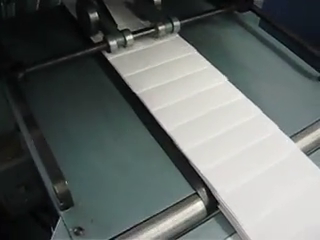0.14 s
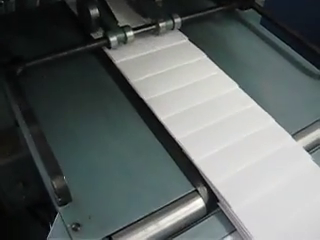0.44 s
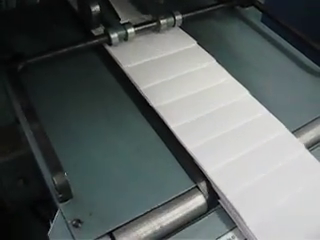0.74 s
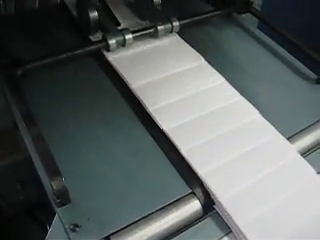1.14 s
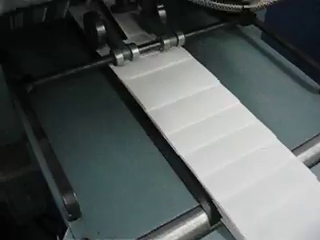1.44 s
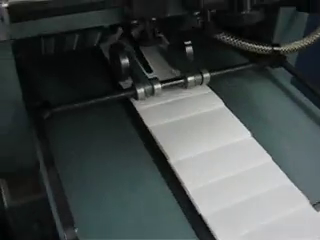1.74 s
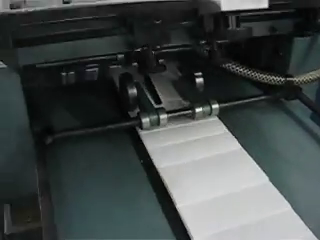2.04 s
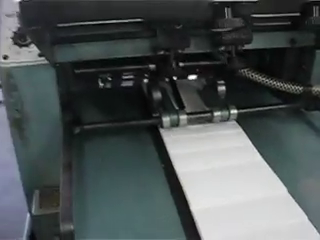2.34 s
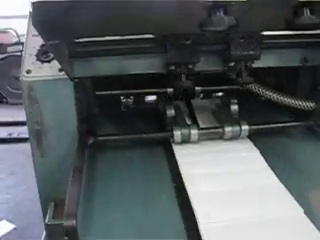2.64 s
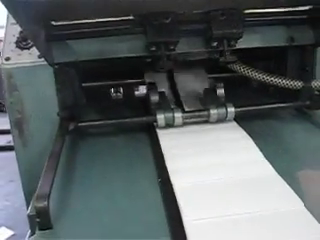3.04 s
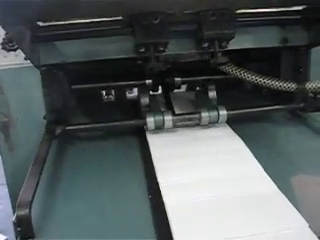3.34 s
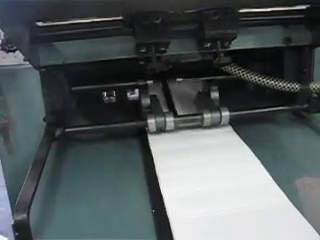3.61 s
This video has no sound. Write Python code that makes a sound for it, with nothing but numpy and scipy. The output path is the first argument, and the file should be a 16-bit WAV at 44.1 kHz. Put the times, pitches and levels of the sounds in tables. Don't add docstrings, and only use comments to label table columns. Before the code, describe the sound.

A paper-folding machine whirrs in a workshop, close to a hand-held stereo microphone; about twice a second a sheet swishes in, flaps through rollers, snaps into the fold and slaps onto the pile.

```python
import sys
import numpy as np
from scipy import signal
from scipy.fft import rfft, irfft, next_fast_len
from scipy.io import wavfile
from scipy.ndimage import uniform_filter1d, map_coordinates

SR = 44100
rng = np.random.default_rng(int(sys.argv[2]) if len(sys.argv) > 2 else 0)


def invert_db(level):
    return 10 ** (np.asarray(level, dtype=float) / 20)


def file_out(sig):
    cols = np.atleast_2d(sig).T
    lim = np.clip(cols, -1, 1)
    pcm = np.round(lim * 32767).astype(np.int16)
    wavfile.write(sys.argv[1], SR, pcm)


N = 166257
TAIL = 16384


def unit(x):
    return x / np.sqrt(np.mean(x ** 2) + 1e-20)


def along(points, hz):
    f, v = np.transpose(points)
    return np.interp(np.log(hz + 1), np.log(f + 1), v)


def wobble(rate):
    knots = rng.standard_normal(int(N * rate / SR) + 4)
    return map_coordinates(knots, [np.arange(N) * rate / SR])


def gate(start_s, end_s, rise_s, fall_s):
    t = np.arange(N) / SR
    return np.clip(np.minimum((t - start_s) / rise_s, (end_s - t) / fall_s), 0, 1)


def coloured(x, points):
    n = x.shape[-1]
    m = 2 * next_fast_len(n // 2 + 2048)
    gain = invert_db(along(points, np.fft.rfftfreq(m, 1 / SR)))
    cepstrum = irfft(np.log(gain), m)
    cepstrum[1:m // 2] *= 2
    cepstrum[m // 2 + 1:] = 0
    return irfft(rfft(x, m) * np.exp(rfft(cepstrum)), m)[..., :n]


# (frequency [Hz], likeness [0-1])
PORT_LIKENESS = [(300, .999), (700, .99), (1400, .975), (2900, .85), (4500, .72), (8000, .62), (10500, .35),
                 (15000, .2)]


def pair(n):
    likeness = along(PORT_LIKENESS, np.fft.rfftfreq(n, 1 / SR))
    turn = np.arccos(np.clip(likeness, 0, 1)) / 2
    mid, side = irfft(rfft(rng.standard_normal((2, n))) * [np.cos(turn), np.sin(turn)], n)
    return np.array([mid + side, mid - side])


def rush(points, patchy_db):
    z = signal.stft(pair(N + N % 2), nperseg=256)[2]
    field = rng.standard_normal(z.shape[1:])
    field = uniform_filter1d(uniform_filter1d(field, size=5, axis=0), size=5, axis=1)
    patchy = signal.istft(z * invert_db(patchy_db * unit(field)), nperseg=256)[1][:, :N]
    return unit(coloured(patchy, points))


def burst(points, attack_s, hold_s, t60, sag_db=0, size=4096):
    t = np.arange(size) / SR
    fall_db = sag_db * np.minimum(t / hold_s, 1) + 60 * np.maximum(t - hold_s, 0) / t60
    ragged_db = 1.5 * np.repeat(rng.standard_normal(size // 16), 16)
    envelope = np.clip(t / attack_s, 0, 1) * invert_db(ragged_db - fall_db)
    sound = coloured(pair(size) * envelope, points)
    return sound / np.sqrt(np.mean(sound[:, :round(hold_s * SR) + 40] ** 2))


def ring(modes, rise_s, climb=0):
    t = np.arange(4096) / SR
    sound = 0
    for hz, db, t60 in modes:
        decay = invert_db(db + rng.normal(0, 1) - 60 * t / t60)
        sound = sound + decay * np.sin(2 * np.pi * (hz * t * (1 + climb * t) + rng.random()))
    return np.tile(sound * (1 - np.exp(-t / rise_s)), (2, 1))


def peak(hz, wide):
    return [(hz / 4, -45), (hz / wide, -9), (hz, 0), (hz * wide, -9), (hz * 4, -40)]


def add(out, s, sound):
    out[:, round(s * SR):][:, :sound.shape[1]] += sound


# (enter [s], leave [s], rush level [dB], flap level [dB], swish level [dB])
SHEETS = [
    (.08, 0.39, -5, -13, -6),
    (0.6, 0.911, 2, 1, -2),
    (1.022, 1.25, 2, -4, 1),
    (1.574, 1.88, 1.5, -1, 5),
    (2.064, 2.42, -2, 0, 5),
    (2.69, 3.036, 0.5, 1, -12),
    (3.185, 3.448, 0.5, 3, -12),
    (3.626, 3.9, -2.5, 0, -6),
]
# (frequency [Hz], level [dB])
RUSH = [(500, -24), (900, -3.5), (1700, 6.5), (3000, -4), (5000, -3), (8000, 1.5), (15500, -11)]
# (frequency [Hz], level [dB])
FLAP = [(200, -35), (350, -6), (450, -1.5), (620, -0.5), (900, -24), (2000, -61)]
# (frequency [Hz], level [dB])
SLIDE = [(3000, -38), (6300, -16), (7800, -6), (9200, 2.5), (10500, -5), (12500, 0), (15500, -7)]


def sheets():
    inside = np.array([gate(enter, leave, 0.057, 0.0091) for enter, leave, *_ in SHEETS])
    rush_gain, flap_gain = invert_db(np.array(SHEETS)[:, 2:4].T) @ inside
    rise_s = 0.2
    slide_gain = sum(invert_db(swish_db) * gate(enter + 0.037 - rise_s, leave, rise_s, 0.17)
                     for enter, leave, _, _, swish_db in SHEETS)
    grain = unit(invert_db(2.2 * wobble(300)) * rush(RUSH, patchy_db=2.2))
    rushing = invert_db(-26.5 + 1.2 * wobble(20)) * rush_gain * grain
    flapping = invert_db(-33) * flap_gain * unit(invert_db(1.2 * wobble(40)) * rush(FLAP, patchy_db=1.0))
    sliding = invert_db(-28.5 + 0.8 * wobble(12)) * slide_gain * rush(SLIDE, patchy_db=3)
    return rushing + flapping + sliding


# (time [s], bright level [dB], knock level [dB], spike level [dB], knock delay [ms])
SNAPS = [
    (0.345, -9, -4.5, -9, 3.2),
    (0.8216, -6.5, -9, -8, 0.84),
    (1.177, -6.5, -7.5, -11, 1.13),
    (1.818, -7, -2.5, -1.5, 1.86),
    (2.339, -12, -1.5, 3, 2.6),
    (2.9393, -15.5, -2, 9, 2.2),
    (3.426, -16, -7, 2, 3.4),
]
# (frequency [Hz], level [dB])
CRACK = [(1500, -18), (3000, -10), (3700, -9), (4300, -1), (5000, -4), (5900, -13), (7300, -6),
         (15500, -36)]
# (frequency [Hz], level [dB], T60 [s])
SNAP_RING = [(4250, -2, .022), (4700, -6, .018), (7250, -2, .018)]
# (frequency [Hz], level [dB])
KNOCK = [(300, -15.5), (700, -2.5), (1600, -3), (2600, -11), (4000, -14)]
# (frequency [Hz], level [dB])
SPIKE = [(300, -25), (900, -6), (1600, 0), (3000, -5), (4500, -4), (7000, -24), (12000, -40)]


def snaps():
    out = np.zeros((2, N + TAIL))
    spike = coloured(np.eye(1, 512) * [[1], [1]], SPIKE)
    spike = spike / np.abs(spike).max()
    for s, bright_db, knock_db, spike_db, delay_ms in SNAPS:
        knock_s = s + delay_ms / 1000
        add(out, s, invert_db(bright_db - 6) * burst(CRACK, 0.0004, 0.004, 0.006, sag_db=3))
        add(out, s + .0005, invert_db(bright_db - 6) * ring(SNAP_RING, .0008))
        add(out, knock_s, invert_db(knock_db - 9.5) * burst(KNOCK, 0.0003, 0.0022, 0.018))
        add(out, knock_s, invert_db(spike_db) * spike)
    return out[:, :N]


# (time [s], peak level [dB], thud frequency [Hz], thud level [dB], bright level [dB])
SLAPS = [
    (0.414, -1, 1740, -3.5, -6.5),
    (0.89, -2.5, 1840, -2, -4),
    (1.246, -4, 1850, -2, -7),
    (1.888, -1, 1900, -3, -8),
    (2.407, 3, 1600, -6.5, -10.5),
    (3.007, -3, 1400, -1, -2),
    (3.495, -1, 1220, -2, -8),
]
# (frequency [Hz], level [dB], T60 [s])
PLATE = [(2850, -9, .04), (3000, 0, .045), (3170, -9, .03), (4180, -6, .035), (4660, -8, .03),
         (7450, -14, .02)]


def slaps():
    out = np.zeros((2, N + TAIL))
    thud_t60 = .017
    for s, db, hz, thud_db, bright_db in SLAPS:
        thud = ring([(hz, 0, thud_t60), (hz * 1.17, -8, thud_t60)], .0002, climb=15)
        add(out, s, invert_db(db - 2.5 + thud_db) * thud)
        add(out, s, invert_db(db - 15 + thud_db) * burst(peak(hz, wide=1.6), 0.0002, .006, 0.025, sag_db=4))
        add(out, s + 0.00119, invert_db(db - 9.5) * ring(PLATE, rise_s=.0015))
        add(out, s, invert_db(db - 21) * burst(peak(PLATE[1][0], wide=1.1), .006, .014, .06))
        add(out, s + .0008, invert_db(db - 9 + bright_db) * burst(CRACK, .0012, .009, 0.0082, sag_db=5))
    return out[:, :N]


# (time [s], peak level [dB], frequency [Hz])
TICKS = [(0.157, -1.5, 2670), (0.286, -7, 1900), (.631, -17, 3100), (0.762, -5, 1870), (1.116, -6.5, 1400),
         (1.194, -4, 5200), (1.225, -13, 2200), (1.759, -2.5, 3000), (2.234, -17, 1690), (2.28, -5, 2720),
         (2.39, -7, 1800), (2.864, -7, 1730), (3.366, -5.5, 1583), (3.385, -4.5, 1710), (3.415, -1, 1500),
         (3.469, -3, 1990)]


def ticks():
    out = np.zeros((2, N + TAIL))
    for s, db, hz in TICKS:
        add(out, s, invert_db(db - 14.0) * burst(peak(hz, wide=2.6), 0.00093, 0.0016, 0.021))
    return out[:, :N]


# (start [s], length [s], level [dB], frequency [Hz])
BRUSHES = [(.2, 0.13, 0.5, 8300), (.66, 0.14, 3, 8100), (1.0, 0.26, 4, 8500), (1.5, 0.11, 2, 6500),
           (1.66, .05, -6, 12000), (2.08, 0.15, 3, 7400), (2.48, 0.28, 3.5, 7700), (2.78, .08, -6, 12000),
           (3.16, 0.049, 8, 8600), (3.29, .07, -6, 12000), (3.65, 0.071, 6, 8400), (1.64, .16, -0.5, 1040),
           (2.2, .12, 0, 1050), (2.76, 0.16, 0.5, 1100), (3.24, .18, 1.5, 1070), (3.7, .07, -1.5, 1070),
           (1.9, 0.27, 4, 5400), (3.05, 0.31, 2.5, 4500), (1.3, 0.34, -0.5, 4430), (.74, .06, -3.5, 920),
           (0, 0.12, 2, 4330)]


def brushes():
    out = np.zeros((2, N + TAIL))
    for s, length, db, hz in BRUSHES:
        band = peak(hz, 1.045 + 250 / hz)
        add(out, s, invert_db(db - 32) * burst(band, 0.04, length, 0.13, size=16384))
    return out[:, :N]


# (time [s], peak level [dB], frequency [Hz])
THUMPS = [(0.149, -24, 490), (0.284, -22.5, 392.5), (1.11, -19, 447), (2.754, -17.5, 378),
          (2.813, -21.5, 485), (2.864, -20, 540), (2.895, -16.5, 463), (2.928, -18, 670), (3.235, -20, 424),
          (3.387, -17, 373), (3.727, -17.5, 425)]


def thumps():
    out = np.zeros((2, N + TAIL))
    for s, db, hz in THUMPS:
        add(out, s - .004, invert_db(db - 7) * burst(peak(hz, wide=1.043), 0.0034, 0.0135, 0.062))
    return out[:, :N]


# (start [s], length [s], level [dB])
RATTLES = [
    (0.175, 0.3, -4.5),
    (0.663, 0.3, -2),
    (1.06, 0.22, -2),
    (1.65, 0.15, 1),
    (2.15, 0.3, -8),
    (2.774, 0.19, -1),
    (3.26, 0.17, -0.5),
    (3.643, 0.11, -4),
]
# (frequency [Hz], level [dB])
CHATTER = [(5000, -49), (8500, -5), (10000, -7.5), (12000, 2), (15500, -10)]


def teeth():
    tooth_hz, start_cycles, sharpness = 73.474, .44, 1.5
    turn = 2 * np.pi * (tooth_hz * np.arange(N) / SR - start_cycles)
    gain = sum(invert_db(db) * gate(s, s + length, 0.023, 0.077) for s, length, db in RATTLES)
    puffs = unit(np.exp(sharpness * np.cos(turn)) * invert_db(3.6 * wobble(60)))
    throb_gain = (.4 + np.sqrt(gain)) * invert_db(-49.5 + 2.5 * wobble(11))
    throb = throb_gain * np.sin(turn + 0.87 * wobble(8.8))
    return gain * invert_db(-19.5) * puffs * rush(CHATTER, patchy_db=3) + throb


# (time [s], level [dB])
WHIRR = [(0.0, -21), (0.25, -26.5), (0.61, -24.5), (1.08, -25), (1.61, -24.5), (1.82, -23.5), (2.87, -26),
         (3.0, -24), (3.3, -26.5), (3.64, -23), (3.77, -27.5)]
# (time [s], share [0-1])
NEAR = [
    (1.4, 0),
    (2.2, 1),
    (2.8, 0.8),
]
# (frequency [Hz], level [dB])
BODY = [(100, -31.5), (125, -5), (160, -5.5), (450, 3.5), (850, -2.5), (2000, -3), (2950, 1.5), (3600, -3)]
# (frequency [Hz], level [dB])
HISS = [(2500, -14), (3650, -5.5), (4150, 8), (5000, 4.5), (5900, 0.5), (9000, -1.5), (12000, -1.5),
        (15500, -26)]
# (frequency [Hz], level [dB])
HISS_NEAR = [(2500, -10.5), (4300, 5.5), (5200, 0.5), (6100, -18), (7500, -7.5), (9000, -5.5), (12000, 2),
             (15500, -4)]
# (frequency [Hz], rms level [dB])
HUM = [(116.3, -50), (163.5, -45), (232.2, -44.5), (307, -84), (457, -44), (612, -42.5)]
HUM_DRIFT = [0.45, 1.7, 0.19, 1.3, 0.82, 2.3]


def machine():
    s, level_db = np.transpose(WHIRR)
    t = np.arange(N) / SR
    slow_db = np.interp(t, s, level_db - level_db.mean())
    near = np.clip(np.interp(t, *np.transpose(NEAR)), 0, 1)
    body = invert_db(-21 + 2 * near + 1.2 * wobble(12)) * rush(BODY, patchy_db=1.1)
    belts = np.sqrt(1 - near) * rush(HISS, patchy_db=1.55) + np.sqrt(near) * rush(HISS_NEAR, patchy_db=3.0)
    hiss = invert_db(-23.5 + slow_db + 0.8 * wobble(25.15) + 0.86 * wobble(140)) * belts
    grit = invert_db(-32 + slow_db) * unit(invert_db(5 * wobble(420)) * rush(RUSH, patchy_db=-3.5))
    hum = 0
    for (hz, db), drift in zip(HUM, HUM_DRIFT):
        phase = 2 * np.pi * hz * t + 6 * rng.random() + drift * wobble(14)
        hum = hum + np.sqrt(2) * invert_db(db + 3 * wobble(15)) * np.sin(phase)
    return body + hiss + grit + hum


def scene():
    paper = sheets() + snaps() + slaps() + ticks() + brushes()
    return paper + thumps() + teeth() + machine()


def squeezed(x):
    ceiling = .85
    return x / (1 + np.abs(x / ceiling) ** 5) ** (1 / 5)


def low_pass(x):
    return signal.sosfilt(signal.butter(12, 15740, fs=SR, output="sos"), x)


# (frequency [Hz], level [dB])
LOW_CUT = [(25, -23), (110, -2.5)]
# (frequency [Hz], level [dB])
LEFT_PORT = [(1000, -2.14), (3500, 2.76), (4100, 7), (4950, 7), (6100, 1.5), (8500, -3.5), (10300, -12),
             (11700, -11)]
# (frequency [Hz], level [dB])
RIGHT_PORT = [(1000, -1.66), (2900, 2.73), (3700, -2.5), (6000, 0.5), (7400, 6), (9300, 1.5), (10300, -5.5),
              (12500, -12)]
# (frequency [Hz], level [dB])
TOP_FALL = [(14000, -12.5), (15700, -18)]


def record(dry):
    hz, t = np.fft.rfftfreq(N, 1 / SR), np.arange(N) / SR
    left = coloured(dry[0], LOW_CUT + LEFT_PORT + TOP_FALL)
    right = coloured(dry[1], LOW_CUT + RIGHT_PORT + TOP_FALL)
    lag_s = .00003
    lag = np.exp(np.outer([-1j, 1j], np.pi * hz * lag_s))
    ports = irfft(rfft(np.array([left, right])) * lag, N)
    blow_s = np.array([row[0] for row in SNAPS + SLAPS])
    after = t - blow_s[:, None] - .012
    ducks = np.clip(after / 0.0014, 0, 1) * np.exp(-np.abs(after) / 0.06)
    duck_db = -2 * ducks.sum(axis=0)
    return low_pass(squeezed(ports * invert_db(duck_db)))


dry = scene()
out = record(dry)
file_out(out)
```